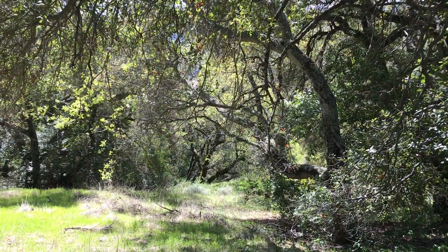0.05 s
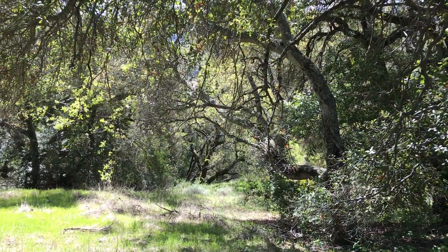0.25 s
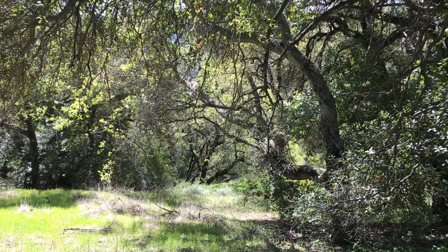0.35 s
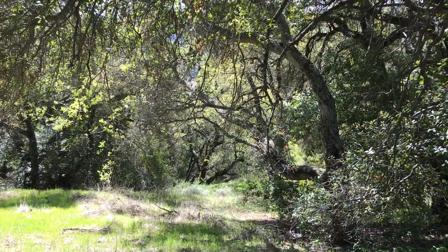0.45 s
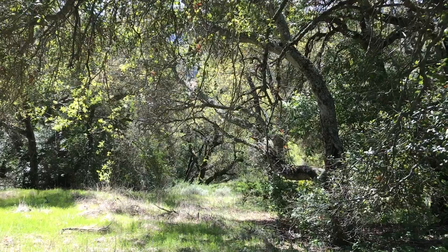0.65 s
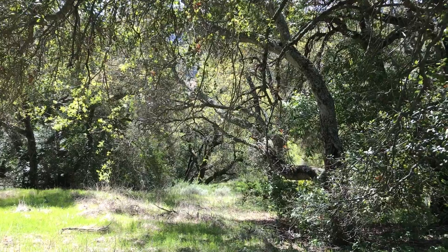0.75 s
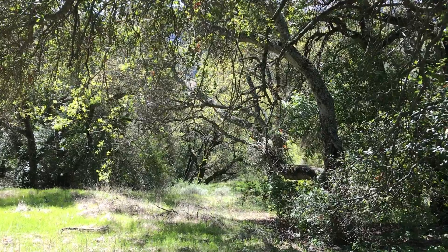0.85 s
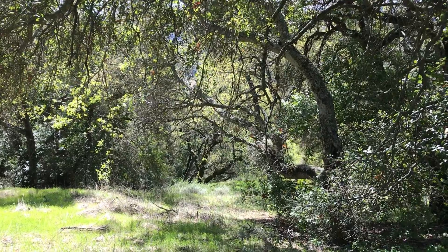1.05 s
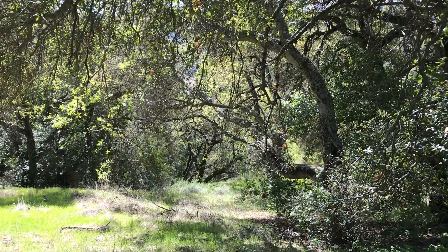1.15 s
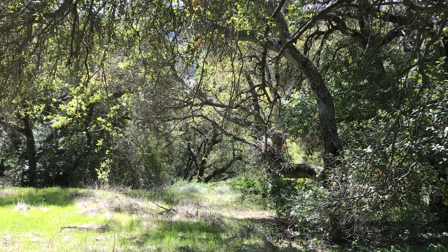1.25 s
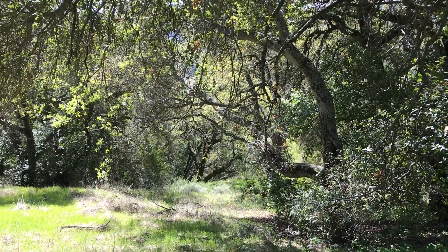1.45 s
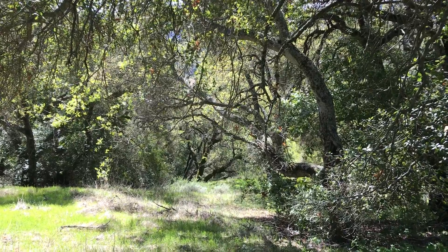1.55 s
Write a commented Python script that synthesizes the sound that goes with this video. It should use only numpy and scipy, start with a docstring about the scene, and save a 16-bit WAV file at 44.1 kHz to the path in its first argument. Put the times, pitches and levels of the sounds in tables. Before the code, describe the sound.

A distant chorus of tree frogs calls steadily, with low wind rumble on the microphone.

```python
"""A wooded clearing, with a chorus of tree frogs calling from the far side.
Each note is a train of pulses ringing a vocal sac, mostly rising in pitch; echoes from the trees
blur the many callers together, and the nearest stand out. Gusts buffet the microphone.
Small birds whistle, chip and rasp faintly in the distance, over a quiet hiss and a few dry ticks."""
import sys
import numpy as np
from scipy import signal
from scipy.fft import rfft, irfft
from scipy.io import wavfile
from scipy.ndimage import uniform_filter1d

SR = 44100
rng = np.random.default_rng(int(sys.argv[2]) if len(sys.argv) > 2 else 0)


def to_wav(sig):
    """Store sig (one row per channel, or 1-D mono) as 16-bit WAV at the path in sys.argv[1].

    Samples outside -1..1 are clipped; the rate is SR.
    """
    pcm = np.clip(np.atleast_2d(sig), -1, 1) * 32767
    pcm = np.round(pcm).astype(np.int16)
    wavfile.write(sys.argv[1], SR, pcm.T)  # frames by channels


N = 70560
TIME, FREQS = np.arange(N) / SR, np.fft.rfftfreq(N, 1 / SR)


def amp(db):
    """Decibels to gain."""
    return 10 ** (np.asarray(db) / 20)


def unit_rms(x):
    """Scales to an rms of one."""
    return x / np.sqrt(np.mean(x ** 2) + 1e-20)


def add(mix, start_s, sound):
    """Mixes a sound in at its start time."""
    part = mix[max(round(start_s * SR), 0):][:len(sound)]
    part += sound[:len(part)]


def noise(spectrum):
    """Noise shaped by (Hz, dB) points."""
    hz, db = np.transpose(spectrum)
    gain = amp(np.interp(np.log(FREQS + 1), np.log(hz), db))
    return unit_rms(irfft(rfft(rng.standard_normal(N)) * gain, N))


def puff(peak_s, width_s, db, hz, width_hz):
    """A brief swell of noise, bell-shaped in time and frequency; widths are standard deviations."""
    band = np.exp(-.5 * ((FREQS - hz) / width_hz) ** 2)
    hiss = unit_rms(irfft(rfft(rng.standard_normal(N)) * band, N))
    return amp(db) * hiss * np.exp(-.5 * ((TIME - peak_s) / width_s) ** 2)


def wander(n, rate):
    """Random drift of about unit size, changing rate times a second."""
    return np.interp(np.arange(n) / SR * rate, np.arange(1024), rng.standard_normal(1024))


def steadied(x, span_s):
    """Evens out a sound's own swells that are longer than span_s."""
    power = uniform_filter1d(abs(signal.hilbert(x)) ** 2, int(span_s * SR)) / 2
    return x / np.sqrt(abs(power) + 1e-9)


def woods(direct, wet_db, t60_s=0.35):
    """Direct sound plus sparse echoes from trunks and leaves."""
    t = np.arange(SR // 2) / SR
    echoes = rng.standard_normal(len(t)) * (rng.random(len(t)) < .03) * amp(-60 * t / t60_s)
    wet = signal.fftconvolve(direct, echoes / np.linalg.norm(echoes))[:N]
    return (direct + amp(wet_db) * wet) / np.sqrt(1 + amp(wet_db) ** 2)


# The hiss behind everything in the clearing. Each row: frequency in Hz, relative level in dB.
AIR_SPECTRUM = [(10, -17), (30, -18), (65, 15.5), (130, 1.5), (250, -2.5), (500, -6.5), (750, -7),
                (1050, -2), (1550, -9), (2500, -10), (3600, -16), (5000, -20), (6500, -21.5), (9500, -25.5),
                (10400, -28), (11500, -25.5), (15500, -24)]


def air(hiss_db=-62.5, whine_db=-94, whine_hz=15000):
    """Quiet outdoor air and microphone hiss, with a thin steady whine."""
    whine = np.sqrt(2) * np.sin(2 * np.pi * whine_hz * TIME)
    return amp(hiss_db) * noise(AIR_SPECTRUM) + amp(whine_db) * whine


# Close to the microphone. Each row: time in seconds, level in dB, centre and width in Hz.
DRY_TICKS = [(.365, -66, 12500, 2400), (0.681, -65.5, 12400, 2420), (1.217, -58, 820, 450),
             (1.369, -67, 12400, 2400)]


def ticks(width_s=0.00058):
    """Tiny dry ticks, each an instant of noise in one band."""
    return sum(puff(peak_s, width_s, db, hz, width_hz) for peak_s, db, hz, width_hz in DRY_TICKS)


def upsweep(length_s, db, from_hz, to_hz, waver, waver_hz):
    """A wavering bird tone that climbs and levels off; a fast waver makes it hoarse."""
    progress = np.linspace(0, 1, int(length_s * SR))
    glide_hz = from_hz + (to_hz - from_hz) * np.sin(np.pi * progress / 2)
    hz = glide_hz * (1 + waver * wander(len(progress), waver_hz))
    swell = abs(np.sin(np.pi * progress)) ** .5
    return amp(db) * unit_rms(swell * np.sin(2 * np.pi * np.cumsum(hz) / SR))


# Distant rising whistles. Each row: start and length in seconds, level in dB,
# first and last pitch in Hz, waver as a share of the pitch.
BIRD_WHISTLES = [(0.474, 0.0616, -71, 3524, 3840, 0.027), (0.529, .075, -70.5, 3850, 4340, .006),
                 (1.432, .085, -73.5, 3770, 4120, 0.015)]
# Quick upward chips. Each row: start and length in seconds, level in dB, first and last pitch in Hz.
BIRD_CHIPS = [(0.37, 0.045, -74, 5900, 7300), (0.407, 0.026, -76, 6000, 7980),
              (0.414, 0.036, -80, 6270, 8070), (0.533, 0.02, -75.5, 6200, 8300),
              (0.548, 0.033, -74, 5620, 7810), (0.664, 0.021, -76.5, 5200, 7540),
              (0.695, 0.018, -78, 6200, 8800), (0.917, .025, -77, 5510, 7020),
              (1.094, 0.017, -78, 5880, 8330), (1.128, 0.019, -80, 6470, 8430),
              (1.574, 0.041, -75.5, 5780, 7220)]
# The bands of one hoarse rasp. Each row: peak time and width in seconds, level in dB,
# centre and width in Hz.
RASP_BANDS = [(1.39, 0.02, -64, 2950, 330), (1.41, 0.028, -74, 4400, 660)]


def birds():
    """Small birds far off in the trees: echoing whistles and chips, and one dry rasp."""
    calls = np.zeros(N)
    for start, *whistle in BIRD_WHISTLES:
        add(calls, start, upsweep(*whistle, waver_hz=504))
    for start, *chip in BIRD_CHIPS:
        add(calls, start, upsweep(*chip, waver=0.114, waver_hz=1486))
    return woods(calls, wet_db=-3) + sum(puff(*band) for band in RASP_BANDS)


# The wind's two colours, before its treble is cut. Each row: frequency in Hz, relative level in dB.
RUMBLE_SPECTRUM = [(10, -48), (25, -21.5), (46, 7.5), (75, 5), (120, -1.5), (185, -10.5), (260, -36.5),
                   (500, -57), (1500, -100)]
FLUTTER_SPECTRUM = [(40, -63), (120, 3.5), (190, -1.5), (320, -2.5), (420, -16.5), (600, -34),
                    (1200, -23.5), (3000, -108)]
# Gusts right on the microphone. Each row: peak time, rise and fall in seconds, rumble and flutter in dB.
MIC_GUSTS = [(.12, 0.05, 0.023, -64, -104), (0.189, 0.0079, 0.026, -50, -79),
             (.275, 0.028, 0.018, -41, -83), (0.348, 0.038, 0.048, -38.5, -46.5),
             (0.484, 0.017, 0.012, -41, -62), (.6, 0.076, 0.085, -53, -72),
             (0.729, 0.0083, 0.0098, -39.5, -39.5), (0.752, 0.03, 0.014, -40.5, -79),
             (0.866, 0.015, 0.011, -38, -67.5), (0.938, 0.062, 0.08, -43.5, -67),
             (1.0, 0.02, 0.0067, -37.5, -48.5), (1.073, 0.0027, 0.011, -45, -42.5),
             (1.118, 0.012, 0.011, -44, -44), (1.148, 0.036, 0.011, -36.5, -51),
             (1.21, 0.044, .05, -55.5, -66.5), (1.368, 0.039, 0.026, -67.5, -59.5)]


def wind(top_hz=623):
    """Gusts buffet the microphone with a low rumble; some flutter higher as well."""
    rumble_power, flutter_power = np.zeros(N), np.zeros(N)
    for peak, rise, fall, rumble_db, flutter_db in MIC_GUSTS:
        swell = np.exp(-((TIME - peak) / np.where(TIME < peak, rise, fall)) ** 2)
        rumble_power += swell * amp(rumble_db) ** 2
        flutter_power += swell ** 2 * amp(flutter_db) ** 2
    rumble = np.sqrt(rumble_power) * steadied(noise(RUMBLE_SPECTRUM), span_s=0.029)
    flutter = np.sqrt(flutter_power) * steadied(noise(FLUTTER_SPECTRUM), span_s=0.016)
    return signal.sosfiltfilt(signal.butter(2, top_hz, fs=SR, output="sos"), rumble + flutter)


def frog_note(length_s, hz, rise_hz, pulse_rate, jitter=0.097, sac_width_hz=174, sway_db=1.5):
    """Uneven pulses ring a frog's vocal sac while its strong second partial glides from hz."""
    progress = np.arange(int(length_s * SR)) / SR / length_s
    cycles = np.cumsum(pulse_rate * (1 + jitter * wander(len(progress), pulse_rate))) / SR
    # Every pulse has its own strength and phase.
    strength, phase_shift = rng.standard_normal((256, 2))[cycles.astype(int) % 256].T
    within_pulse = cycles % 1
    age = within_pulse / pulse_rate * np.pi * sac_width_hz
    ring = age ** 2 * np.exp(-age)
    pulses = ring * (1 - within_pulse ** 8) * amp(sway_db * strength)  # each closes before the next
    phase = np.pi * np.cumsum(hz + rise_hz * progress) / SR + 0.32 * phase_shift  # an octave below hz
    partials_db = [-13.5, 0, -22.5, -36.5]
    tone = sum(amp(db) * np.sin(k * phase) for k, db in enumerate(partials_db, 1))
    return unit_rms(pulses * tone * np.sin(np.pi * progress) ** .5)


# The massed frogs across the clearing. Each row: time in seconds, level in dB, middle pitch in Hz.
FAR_CHORUS = [(0, -60, 2377), (0.151, -62.5, 2287), (0.234, -68.5, 2344), (0.301, -58.5, 2211),
              (0.422, -56.5, 2263), (0.499, -58.5, 2271), (0.599, -64.5, 2307), (.68, -69, 2234),
              (.75, -61.5, 2245), (0.838, -60, 2307), (0.908, -56, 2259), (1.038, -62, 2200),
              (1.11, -59.5, 2274), (1.19, -63, 2348), (1.258, -62.5, 2323), (1.318, -66.5, 2226),
              (1.392, -55, 2206), (1.479, -60, 2203), (1.6, -57.5, 2238)]


def far_frogs(count=150, length_s=0.1, spread_hz=220, rise_hz=104.4, pulse_rate=100, rate_spread=0.399):
    """Many callers scattered round a middle pitch, blurred by the trees, swelling and ebbing together."""
    times, db, middle_hz = np.transpose(FAR_CHORUS)
    lead = SR // 4  # the chorus is already under way at the start
    calls = np.zeros(N + lead)
    for k, (when, pitch, pace) in enumerate(rng.uniform(-1, 1, (count, 3))):
        start = (k + when) / count * len(calls) / SR
        hz = np.interp(start - lead / SR + length_s / 2, times, middle_hz) + spread_hz * pitch
        rate = pulse_rate * (1 + rate_spread * pace)
        add(calls, start, frog_note(length_s, hz - rise_hz / 2, rise_hz, rate))
    blur = steadied(woods(calls[lead:], wet_db=0), span_s=0.05)
    return blur * amp(np.interp(TIME, times, db))


# The frogs nearest the microphone. Each row: start and length in seconds, level in dB,
# starting pitch and rise in Hz, pulses per second.
NEAR_NOTES = [(0.0, 0.045, -68, 2328, 186, 120), (0.066, 0.079, -64, 2250, 56.5, 74),
              (0.169, 0.051, -57, 2327, 37, 122), (0.286, 0.046, -59.5, 2040, 49, 119),
              (0.339, 0.085, -56.5, 1993, 265, 103), (0.389, .085, -63, 2445, -3, 124),
              (0.433, 0.082, -61, 2131, 135, 78), (0.522, 0.071, -64.5, 2306, 126, 99),
              (.703, 0.054, -60.5, 2094, 76, 112), (0.777, .075, -56.5, 2288, 35, 90),
              (0.859, 0.071, -61.5, 2268, 154, 137), (.955, 0.071, -59.5, 2172, -43, 58),
              (1.009, 0.06, -59.5, 2066, 70, 152), (1.065, 0.078, -58, 2243, 196, 114),
              (1.162, 0.081, -62, 2427, 180, 140), (1.273, 0.036, -58.5, 2198, 31, 140),
              (1.328, 0.0744, -62, 2172, 79, 104), (1.418, 0.059, -63, 2128, 50, 69),
              (1.51, 0.078, -56.5, 2248, 128.5, 80)]


def near_frogs():
    """Single notes that stand out of the chorus, closer and with less echo."""
    calls = np.zeros(N)
    for start, length_s, db, hz, rise_hz, pulse_rate in NEAR_NOTES:
        add(calls, start, amp(db) * frog_note(length_s, hz, rise_hz, pulse_rate))
    return woods(calls, wet_db=-6)


def scene():
    """The whole clearing at one microphone."""
    return (near_frogs() + far_frogs() + wind() + birds() + ticks() + air())[None]


def record(dry, low_cut_hz=30, top_hz=15800):
    """The recorder's low cut and band limit."""
    low_cut = signal.butter(3, low_cut_hz, "high", fs=SR, output="sos")
    band_limit = signal.firwin(511, top_hz, window=("kaiser", 9), fs=SR)
    return signal.oaconvolve(signal.sosfilt(low_cut, dry), band_limit[None], "same")


dry = scene()
out = record(dry)
to_wav(out)
```